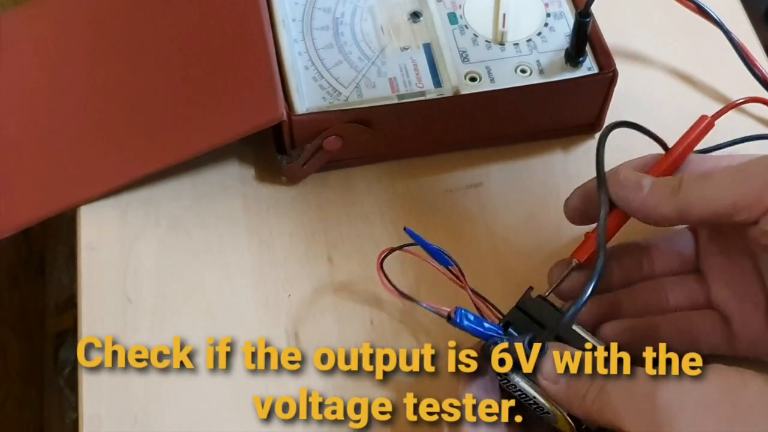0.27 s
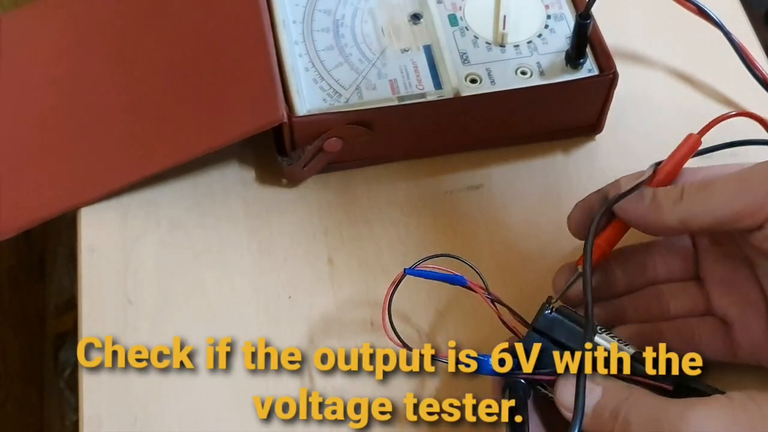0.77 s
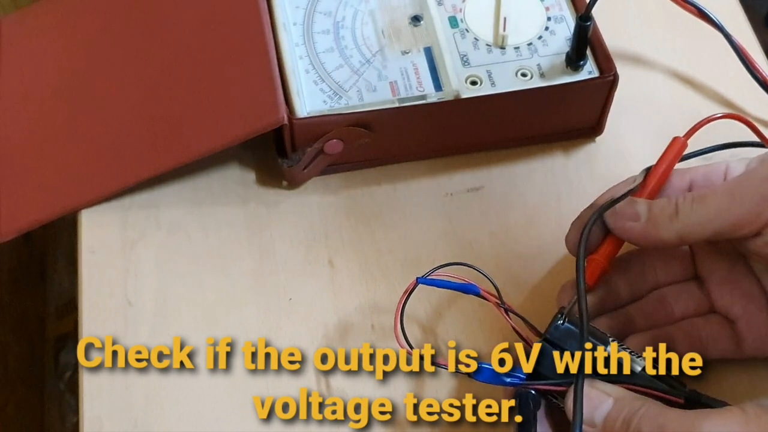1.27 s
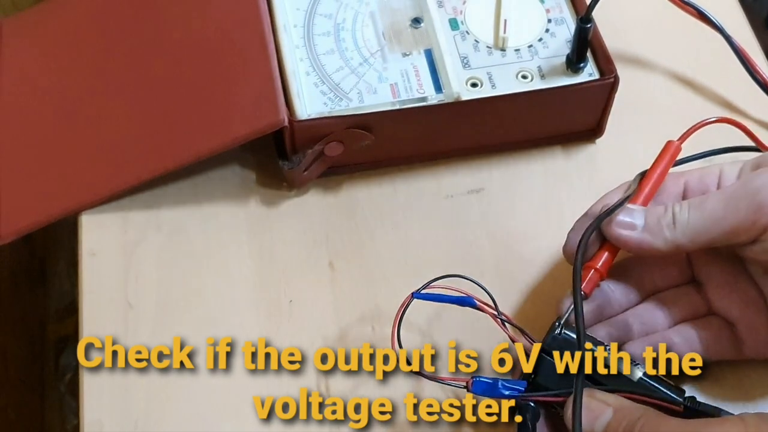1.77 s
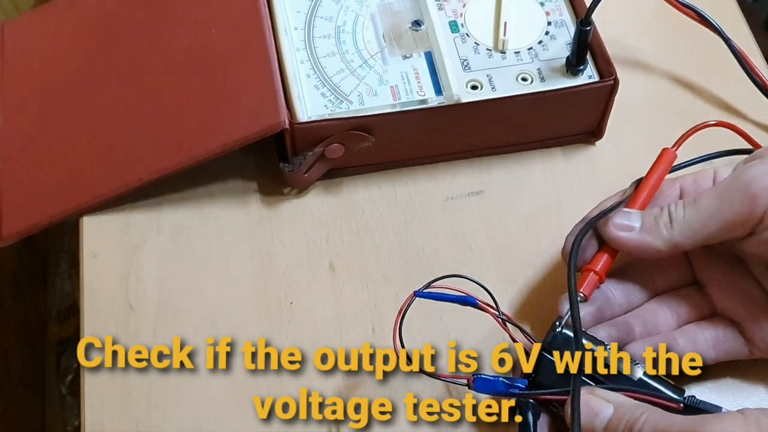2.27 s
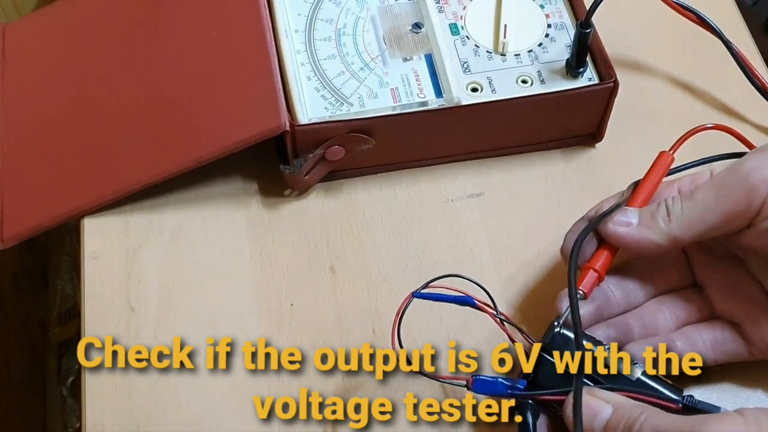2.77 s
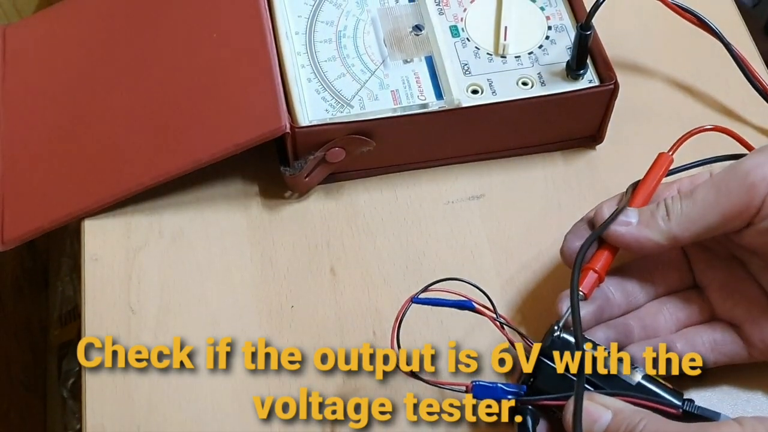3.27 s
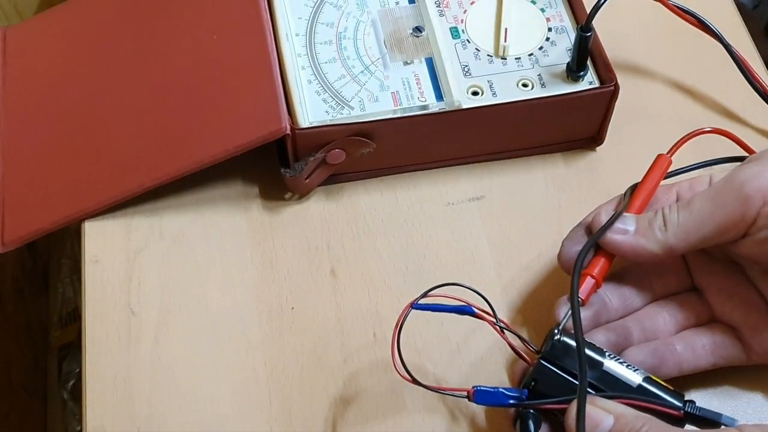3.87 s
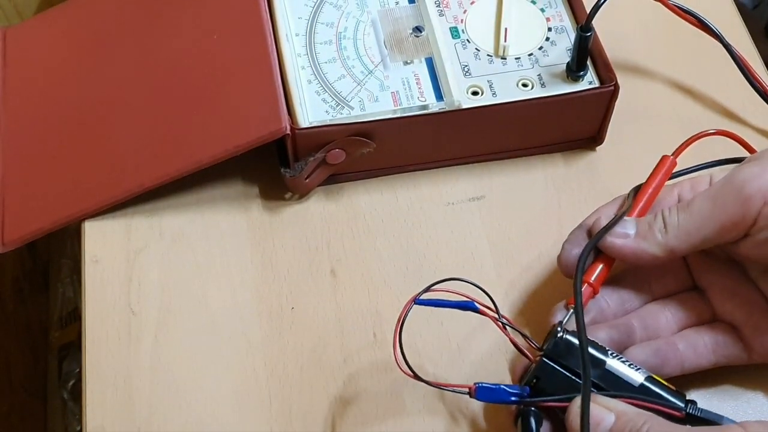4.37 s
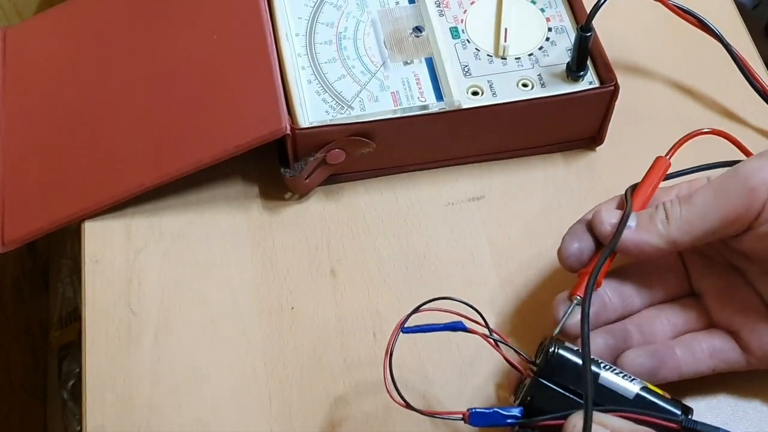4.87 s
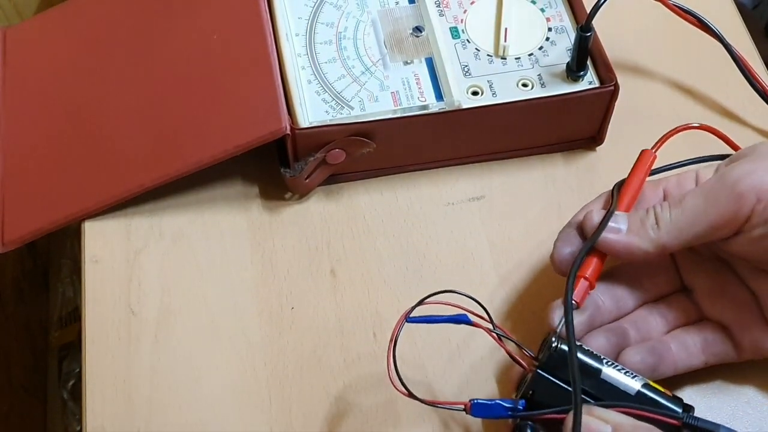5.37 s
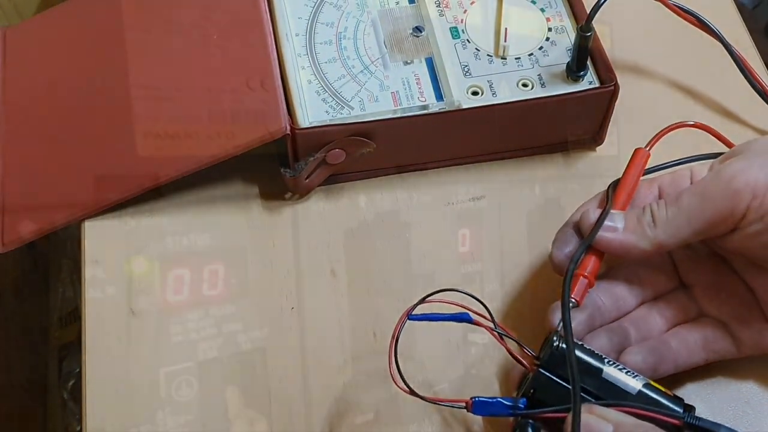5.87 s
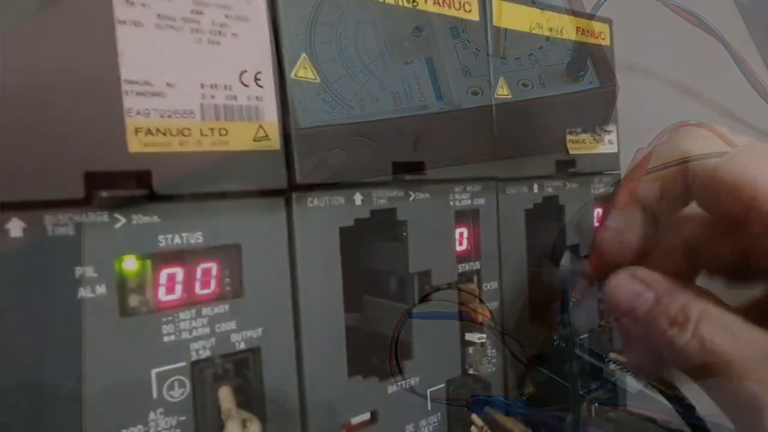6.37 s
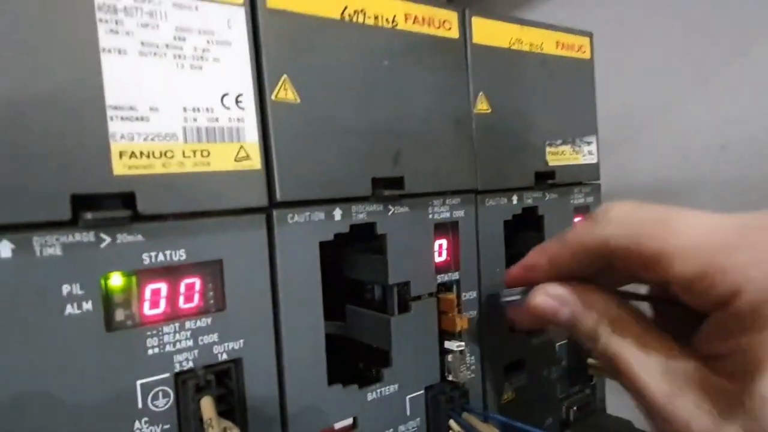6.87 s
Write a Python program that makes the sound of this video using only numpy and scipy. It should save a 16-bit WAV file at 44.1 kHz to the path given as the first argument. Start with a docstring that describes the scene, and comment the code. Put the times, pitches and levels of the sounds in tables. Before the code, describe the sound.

Steady beating machine hum and soft hiss, faint probe clicks, the last one sharpest, then an abrupt change to a swelling cooling fan hum.

```python
"""Several induction motors hum and beat in rumbling, hissing room air, with a faint mains buzz behind them.
A test probe ticks three times on a contact, each tick led in by a short bright scrape.
An edit then cuts this workshop bench and fades in a control cabinet, its cooling fan droning close by.
Hums and buzz are summed sines; air is random spectra with resonances; ticks are decaying noise."""
import sys
import numpy as np
from scipy import signal
from scipy.fft import rfft, irfft
from scipy.io import wavfile
from scipy.ndimage import uniform_filter1d

SR = 44100
rng = np.random.default_rng(int(sys.argv[2]) if len(sys.argv) > 2 else 0)


def to_wav(s):
    """Save 16-bit WAV."""
    ch = np.atleast_2d(s).T  # columns
    pcm = np.round(np.clip(ch, -1, 1) * 32767)  # PCM
    wavfile.write(sys.argv[1], SR, pcm.astype(np.int16))


N = 313533


def gain_of(db):
    """Decibels to amplitude."""
    return 10 ** (np.asarray(db) / 20)


def read(points, hz):
    """A table value at each frequency, joined on a log axis."""
    point_hz, value = np.transpose(points)
    return np.interp(np.log(hz + 1), np.log(point_hz + 1), value)


def over_time(rows):
    """Every column of a curve table at each sample, joined by straight lines."""
    time_s, *columns = np.transpose(rows)
    return [np.interp(np.arange(N) / SR, time_s, column) for column in columns]


def drift(top_hz):
    """Slow wandering of rms 1: twelve sines up to top_hz, the slower ones stronger."""
    hz, start = np.geomspace(top_hz / 20, top_hz, num=12), rng.random(12)
    t = np.arange(0, N, 100) / SR
    sines = np.sin(2 * np.pi * (hz * t[:, None] + start))
    slow = (sines / np.sqrt(hz)).sum(1)
    return np.interp(np.arange(N) / SR, t, slow / slow.std())


def tone(hz, db, pan_db, lead, start=None):
    """A stereo sine of mean power db; pan_db and lead (radians) favour the left, start is in turns."""
    if start is None:
        start = rng.random()
    angle = 2 * np.pi * (np.cumsum(hz * np.ones(N)) / SR + start)
    side = np.array([[.5], [-.5]])
    share = gain_of(side * pan_db)
    return 2 * gain_of(db) * share / np.linalg.norm(share) * np.sin(angle + side * lead)


def noise(colour, modes, same, lead, lean, from_hz, patchy_db, size):
    """Stereo noise from random short-time spectra with resonant lifts; its mid has rms 1 above from_hz."""
    frames, hz = 4 * N // size + 5, np.fft.rfftfreq(size, 1 / SR)
    a, b, c, d, patches = rng.standard_normal((frames, len(hz), 5)).T
    # smooth level patches across pitch, then across time
    patches = uniform_filter1d(patches, size=size // 100, axis=0)
    patches = uniform_filter1d(patches, size=6, axis=1)
    db = read(colour, hz)
    db = db + sum(lift / (1 + (2 * (hz - f) / width) ** 2) for f, width, lift in modes)
    level = gain_of(db[:, None] + patchy_db * patches / patches.std())
    # the right side shares part of the left, and lags it
    like = np.clip(read(same, hz), -1, 1)[:, None]
    left = a + 1j * b
    right = like * left + np.sqrt(1 - like ** 2) * (c + 1j * d)
    right = right * np.exp(-1j * read(lead, hz))[:, None]
    half = gain_of(read(lean, hz) / 2)[:, None]
    z = np.array([left * half, right / half]) * level
    x = signal.istft(z, nperseg=size, noverlap=size * 3 // 4)[1][:, :N]
    power = abs(z.mean(0)) ** 2
    share = np.sum(power[hz > from_hz]) / np.sum(power)
    return x / np.sqrt(share * np.mean(x.mean(0) ** 2))


SHAFT_HZ = 29.666
# unbalance hum at the shaft speed: time_s, level_db
SHAFT_HUM = [(0.0, -41.5), (6.2, -39)]
# leading motor tones, near shaft orders 4, 8 and 12: pitch_hz, level_db, left_right_db, left_lead_rad
LEADING_TONES = [(118.59, -36.5, 0, .15), (237.32, -39.5, .5, .2), (356.05, -42.5, -2, .2)]
# neighbouring tones, from other motors or mains hum, one list per leading tone:
# pitch_hz, level_db, loudest_beat_s, left_right_db
NEIGHBOUR_TONES = [
    [(117.39, -40, 3.002, 0), (115.66, -40, 2.945, .5), (119.96, -42, 3.099, .5)],
    [(229.52, -43.5, 3.081, .5), (241.82, -44.5, 3.208, .5)],
    [(354.55, -46.5, 3.285, 7), (351.64, -51, 3.149, -9), (359.93, -59, 3.069, -4)],
]
# motor and fan tones, levels before their drift: pitch_hz, level_db, left_right_db, left_lead_rad
MOTOR_TONES = [(59.22, -42, 0, .1), (88.95, -47, 0, .4), (148.12, -46.5, 0, 0), (175.42, -49, 2, .2),
               (177.31, -43.5, 1, -.1), (179.9, -50, 0, 0), (263.7, -43, 6, .1), (474.74, -56, 4, 1),
               (526.26, -54, 3, 1.3), (531.85, -54, -4, 1), (538.75, -50, -1, 1.1), (593.2, -60, 2, .7),
               (701.64, -64, 6, 1.7), (712.11, -61, 4, .8), (808.08, -62, 17, -1.5), (830.6, -63, 3, .3),
               (1063.66, -69, 2, -.8), (1077.5, -65, 9, -2.4), (1346.8, -72, -10, 3),
               (1612.4, -71, -4, 1.4), (1749.2, -67, 10, -2)]


def motors():
    """Close-pitched hum sines drift in and out of step and beat; further tones waver in level."""
    out = tone(SHAFT_HZ, over_time(SHAFT_HUM)[0], -0.73, 0)
    for (hz, db, pan_db, lead), neighbours in zip(LEADING_TONES, NEIGHBOUR_TONES):
        start = rng.random()
        out += tone(hz, db, pan_db, lead, start)
        for other_hz, other_db, beat_s, other_pan_db in neighbours:
            # start phase that brings both tones into step at beat_s
            other_start = start + (hz - other_hz) * beat_s
            out += tone(other_hz, other_db, other_pan_db, lead, other_start)
    for hz, db, pan_db, lead in MOTOR_TONES:
        out += tone(hz, db + 1.24 * drift(2.07), pan_db, lead)
    return out


MAINS_HZ = 59.978
# faint buzz outline for even multiples, before random scatter: pitch_hz, level_db
BUZZ_OUTLINE = [(600, -76), (1200, -78), (1800, -79), (2100, -80), (3000, -86), (4300, -83), (5000, -82),
                (6150, -81), (6400, -92), (7000, -92)]
# extra tones on multiples that stand out: mains_multiple, level_db, left_right_db, left_lead_rad
STRONG_BUZZ = [(15, -71, -8, -.6), (20, -66, -12, -1.8), (25, -69, 6, 2), (26, -69, 16, 1.2),
               (28, -72, 10, 1.9), (30, -70, -2, -.2), (84, -78, -6, .2), (90, -79, 0, -.6),
               (102, -80, 1, 0)]


def mains_buzz():
    """Multiples of the mains, odd ones weaker, each scattered unevenly by the room."""
    multiples = np.arange(10, 117)
    luck = rng.standard_normal((len(multiples), 3))
    outline_db = read(BUZZ_OUTLINE, multiples * MAINS_HZ)
    db = outline_db - 6.0 * (multiples % 2) + 2.0 * luck[:, 0]
    out = np.zeros((2, N))
    for k, level_db, (_, pan, lead) in zip(multiples, db, luck):
        out += tone(k * MAINS_HZ, level_db, 8.0 * pan, 2 * lead)
    for k, level_db, pan_db, lead in STRONG_BUZZ:
        out += tone(k * MAINS_HZ, level_db, pan_db, lead)
    return out


RUMBLE_DB, HISS_DB = -28.5, -50  # the hiss level also drifts
# rumble colour, relative: pitch_hz, level_db_per_hz
RUMBLE_COLOUR = [(20, -38), (55, -20), (62, -13), (100, -7), (135, -9.5), (190, -11), (225, -10), (275, -9),
                 (300, -17), (415, -22), (535, -19.5), (575, -24), (800, -24), (1000, -65)]
# room resonances: pitch_hz, width_hz, lift_db
ROOM_RESONANCES = [(41.8, 13, 13), (73, 8.6, 10), (85, 9.3, 4), (110, 8.9, 7), (114, 8.4, 5.5),
                   (231, 11.7, 7), (238.6, 15, 10), (261, 6.4, 1.5), (264, 11.7, 8), (331, 42, 3),
                   (364.2, 37.5, 10), (447.5, 11.5, 9), (476.3, 14, 7), (646, 77, 4)]
# hiss colour, relative: pitch_hz, level_db_per_hz
HISS_COLOUR = [(500, -63), (800, -13), (1400, -22.5), (1730, -21.5), (2500, -23.5), (3610, -28.5),
               (5210, -30.5), (6600, -38), (7550, -39.5), (9100, -29), (10500, -30), (12300, -24.5),
               (13300, -34.5), (14500, -26.5)]
# duct resonances: pitch_hz, width_hz, lift_db
DUCT_RESONANCES = [(934, 32, 6), (1218, 97, 3), (1660, 280, 1.5), (2100, 62, 1)]
# stereo likeness, 1 being identical in left and right: pitch_hz, likeness
ROOM_LIKENESS = [(60, 0.93), (270, 1), (300, 0.21), (520, 0.29), (700, 0.09), (1400, 0.1), (14000, 0.022)]
# phase lead of the left: pitch_hz, left_lead_rad
ROOM_LEAD = [(30, 2), (280, 0.07), (520, 0.5), (620, 4), (800, 2.5), (1400, 3)]
# stereo balance: pitch_hz, left_right_db
ROOM_BALANCE = [(60, -3.5), (130, 1.5), (290, -0.5), (630, 2), (1370, -1), (2980, 1.5), (6510, -3),
                (14200, 1.5)]


def room_air():
    """Low rumble lifted by room modes, and ventilation hiss with microphone noise."""
    stereo = ROOM_LIKENESS, ROOM_LEAD, ROOM_BALANCE
    rumble = noise(RUMBLE_COLOUR, ROOM_RESONANCES, *stereo, 20, patchy_db=1.0, size=8192)
    hiss = noise(HISS_COLOUR, DUCT_RESONANCES, *stereo, 900, patchy_db=.9, size=1024)
    return gain_of(RUMBLE_DB) * rumble + gain_of(HISS_DB + 0.67 * drift(4.3)) * hiss


# probe ticks, each scraping just before contact:
# start_s, tick_db, scrape_s, scrape_db, left_right_db, body_below_7khz_db
PROBE_TICKS = [ (.9893, -42, .004, -60, -.5, -15), (3.2526, -37, .004, -60, -2, -12),
               (4.1654, -21.5, .0125, -35, 0, -3)]
# noise colour of tick and scrape, relative: pitch_hz, level_db_per_hz
PROBE_COLOUR = [(1800, -40), (2500, -18), (2800, -9), (5700, -8), (7080, -15), (8430, -8), (9240, -1),
                (11200, -5), (12500, 0), (13200, -10), (14600, -12)]


def probe():
    """A bright scrape, a sharp tick with a rebound, and the bench reflecting it."""
    out = np.zeros((2, N))
    before = 1000  # samples kept ahead of contact
    t = np.arange(-before, 4000) / SR
    hz, after = np.fft.rfftfreq(len(t), 1 / SR), np.maximum(t, 0)
    for start_s, tick_db, scrape_s, scrape_db, pan_db, body_db in PROBE_TICKS:
        strike = gain_of(-60 * after / .008)  # falls 60 dB in 8 ms
        rebound = gain_of(-14.0) * np.exp(-((t - .0065) / .0015) ** 2)
        reflection = gain_of(-13.5 - 60 * after / .12)
        tick = gain_of(tick_db) * (strike + rebound + reflection) * (t >= 0)
        scrape = gain_of(scrape_db) * np.clip((t + scrape_s) / .004, 0, 1) * (t < 0)
        shared, own = rng.standard_normal(len(t)), rng.standard_normal((2, len(t)))
        z = rfft(0.5 * shared + 0.98 * own) * gain_of(read(PROBE_COLOUR, hz))
        # one noise, with its range below 7 kHz set apart for tick and scrape
        grit = irfft(z * gain_of(body_db * (hz < 7000)), len(t))
        thin = irfft(z * gain_of(-9.0 * (hz < 7000)), len(t))
        sound = tick * grit / grit.std() + scrape * thin / thin.std()
        at = round(start_s * SR) - before
        out[:, at:at + len(t)] += sound * gain_of([[pan_db / 2], [-pan_db / 2]])
    return out


# bench level at the edit; the cabinet opens at the last row: time_s, level_db
BENCH_CUT = [(6.213, 0), (6.2145, -25), (6.2355, -22), (6.2362, -80)]
# cabinet swell, airflow and tones rising unevenly, airflow mostly ahead early on:
# time_s, tones_db, airflow_db
CABINET_FADER = [(6.24, -59, -46), (6.31, -31.5, -28.5), (6.355, -36, -31.5), (6.4, -19.5, -18.5),
                 (6.5, -7, -9), (6.61, -5.5, -1.5), (6.655, -1, 0), (6.83, 0, -0.5), (7.11, 0.5, 0)]
# blade, motor and panel tones before fader and waver: pitch_hz, level_db, left_right_db, left_lead_rad
FAN_TONES = [(263.95, -13, -3, .2), (58.9, -20, 0, -.9), (150.4, -33, -1, -2.2)]
# rms waver of each fan tone: pitch_waver_hz, level_waver_db
FAN_TONE_WAVER = [(.3, 2), (.3, -1.5), (1.5, 2)]
FAN_AIR_DB = -33  # airflow level before the fader
# airflow colour, relative: pitch_hz, level_db_per_hz
FAN_AIR_COLOUR = [(12, -48), (30, -25), (100, -23.5), (200, -25.5), (250, -17), (340, -22), (410, -32),
                  (900, -34), (1700, -38), (2500, -45), (5000, -51), (9130, -62), (12400, -52.5),
                  (14600, -63)]
# sheet-metal cabinet resonances: pitch_hz, width_hz, lift_db
CABINET_RESONANCES = [(72, 9.7, 11), (154.3, 15, 11.5), (312, 22, 12.5), (524, 56, 12.5), (730, 50, 6.5)]
# stereo likeness of the airflow, 1 being identical: pitch_hz, likeness
FAN_LIKENESS = [(60, 0.14), (130, 0.0067), (290, 0.1), (630, 0.014), (14000, 0.017)]
# stereo balance of the airflow: pitch_hz, left_right_db
FAN_BALANCE = [(60, 14), (150, -3), (370, -0.5), (920, 1.5), (2300, 0.5), (5720, 1.5), (14200, 1.0)]


def cabinet():
    """Fan tones that waver a little, over airflow coloured by the sheet-metal box, faded in."""
    tones_db, air_db = over_time(CABINET_FADER)
    lead = [(20, 0), (500, 0.053)]  # pitch_hz, left_lead_rad
    airflow = noise(FAN_AIR_COLOUR, CABINET_RESONANCES, FAN_LIKENESS, lead, FAN_BALANCE,
                    600, patchy_db=1.17, size=2048)
    out = gain_of(FAN_AIR_DB + air_db) * airflow
    for (hz, db, pan_db, lead), (waver_hz, waver_db) in zip(FAN_TONES, FAN_TONE_WAVER):
        pitch_hz = hz + waver_hz * drift(8.0)
        level_db = db + tones_db + waver_db * drift(6.7)
        out += tone(pitch_hz, level_db, pan_db, lead)
    return out * (np.arange(N) / SR > BENCH_CUT[-1][0])


def scene():
    """The bench until the edit, then the cabinet."""
    bench = motors() + mains_buzz() + room_air() + probe()
    return bench * gain_of(over_time(BENCH_CUT)[0]) + cabinet()


EDGE_HZ = 14520


def record(dry):
    """The band limit of the recorder: a steep low-pass filter at EDGE_HZ."""
    low_pass = signal.firwin(511, EDGE_HZ, window=("kaiser", 9), fs=SR)
    return signal.oaconvolve(dry, low_pass[None], "same")


dry = scene()
out = record(dry)
to_wav(out)
```